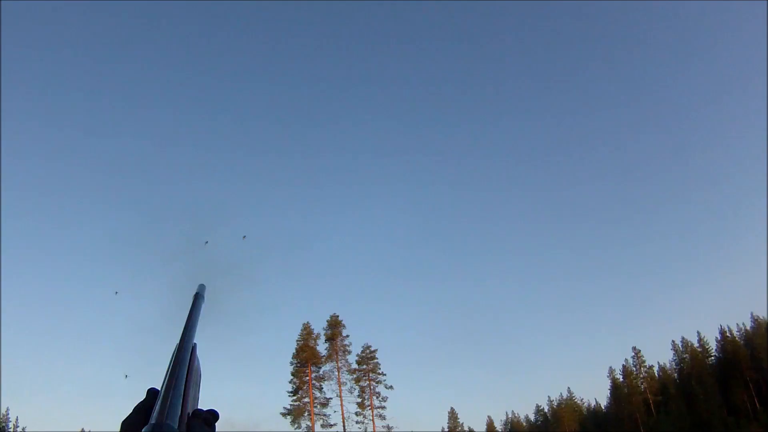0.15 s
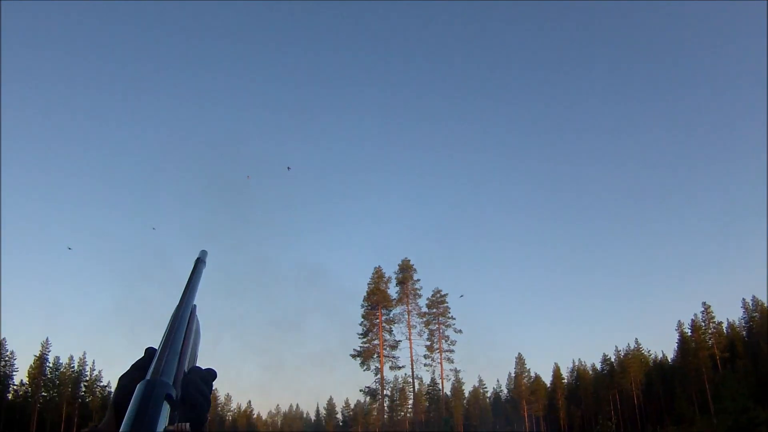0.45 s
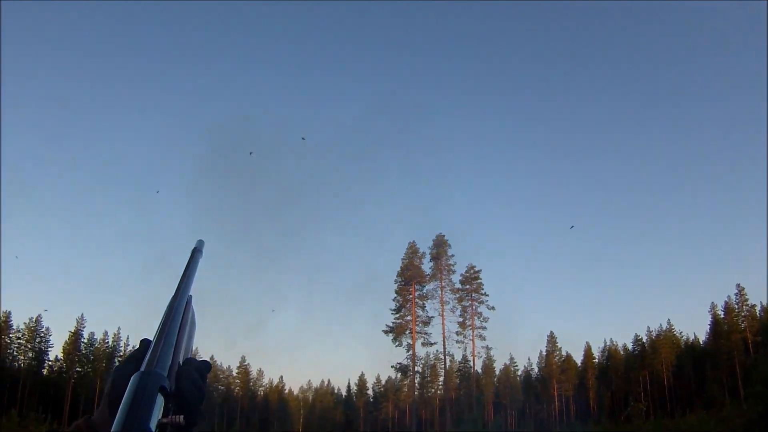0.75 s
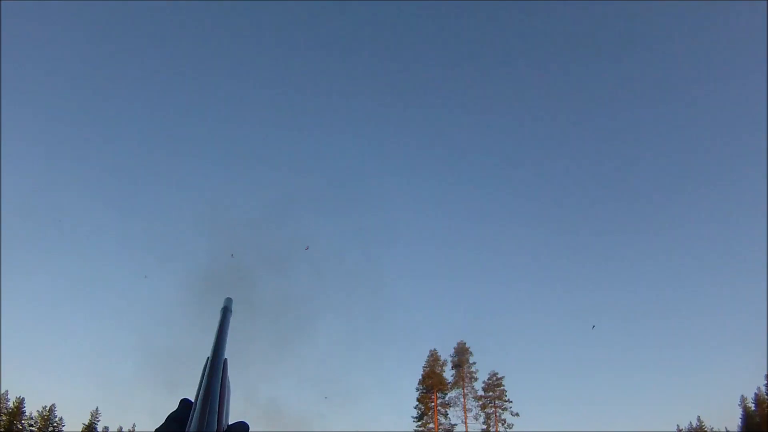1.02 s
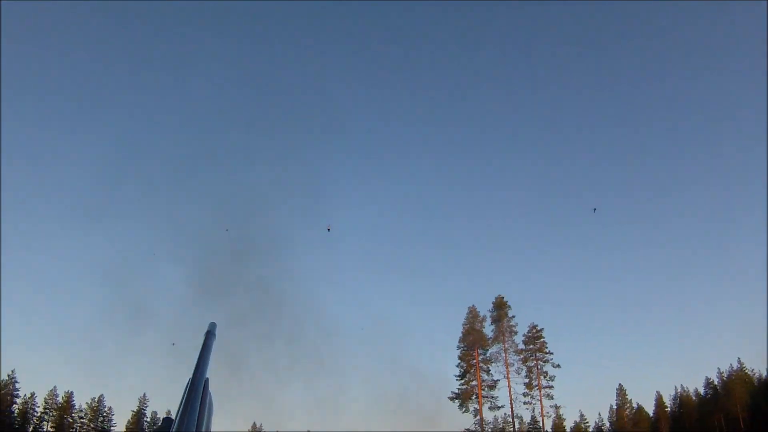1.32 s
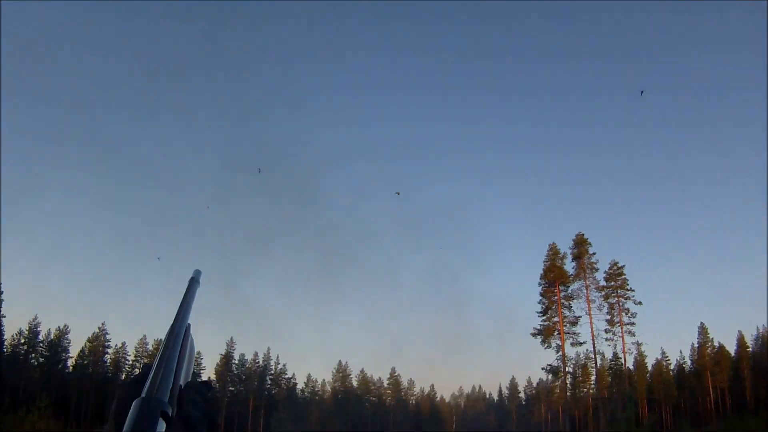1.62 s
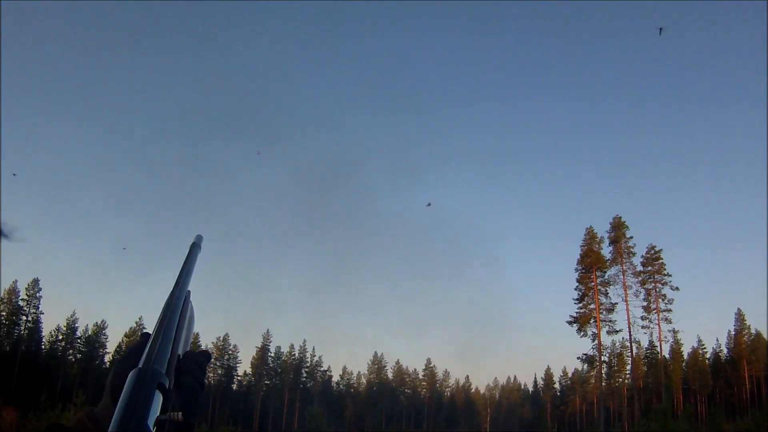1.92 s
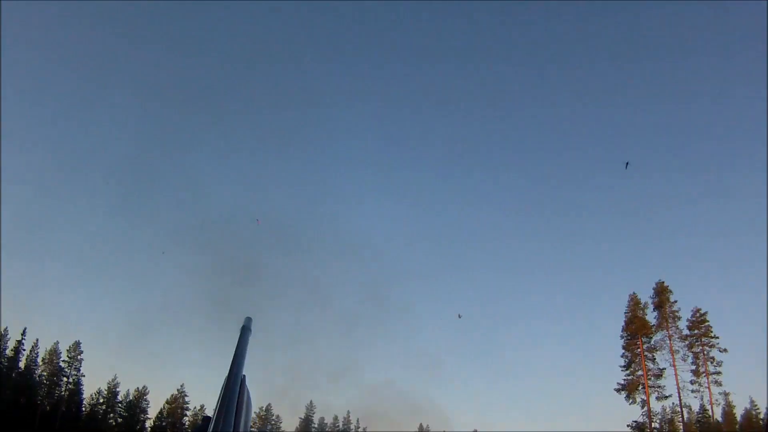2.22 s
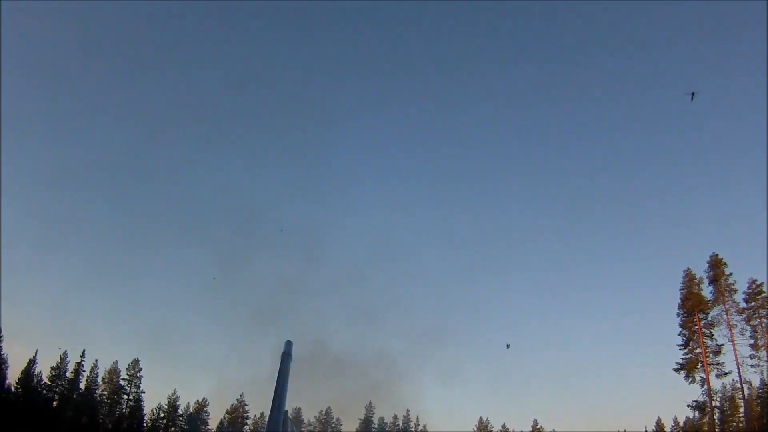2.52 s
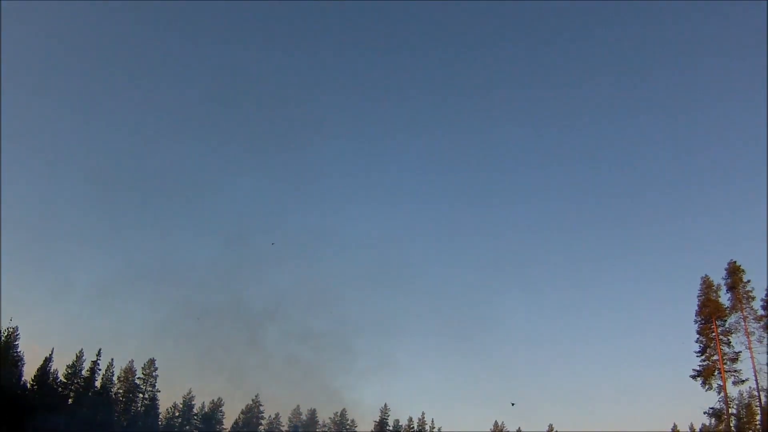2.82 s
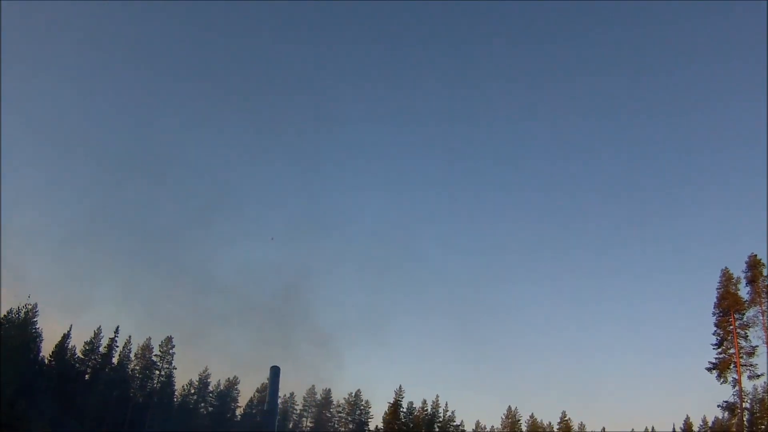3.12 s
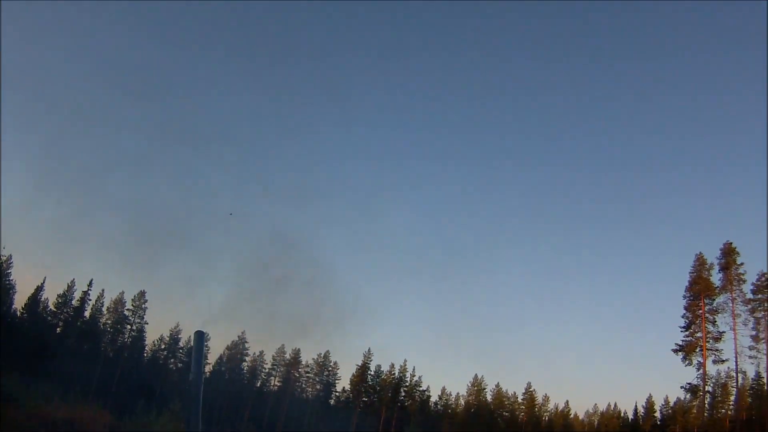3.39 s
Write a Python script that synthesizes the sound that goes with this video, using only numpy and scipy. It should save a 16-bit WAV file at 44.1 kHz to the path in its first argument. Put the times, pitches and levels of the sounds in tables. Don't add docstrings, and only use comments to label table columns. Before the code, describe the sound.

A shotgun fires beside a small camera three times, steel parts rattling after each, then another gun sounds farther away; tree lines return swelling echoes, with gritty lo-fi sound ducking at every shot.

```python
import sys
import numpy as np
from scipy import signal
from scipy.fft import rfft, irfft
from scipy.io import wavfile
from scipy.ndimage import uniform_filter1d

SR = 44100
rng = np.random.default_rng(int(sys.argv[2]) if len(sys.argv) > 2 else 0)


def inscribe(sig):
    pcm = np.round(np.clip(np.atleast_2d(sig).T, -1, 1) * 32767)
    wavfile.write(sys.argv[1], SR, pcm.astype(np.int16))


def nominal_scale(level):
    x = np.asarray(level, float) / 20
    return 10 ** x


N = 156555
T = np.arange(N) / SR
F = np.fft.rfftfreq(N, 1 / SR)

# [t/s, overload length/s, level above clipping/dB, crack level/dB]
BLASTS = [
    (.1498, .0108, 3, -3),
    (.9864, .0108, 3, 1),
    (2.1403, .0108, 2, 0),
    (2.4612, .0036, 5, -12),
]
# [gain dive/dB, afterblast level/dB, echo level/dB]
AFTERMATH = [(23.05, 0, -2), (22.2, -1, -2), (25.56, 2.5, 2.5), (9.26, -19, -13.5)]
SHOTS = [blast + after for blast, after in zip(BLASTS, AFTERMATH)]
# [t/s, level/dB, ring f/Hz, t60/s]
KNOCKS = [(.105, -47, 1000, 0.033), (0.1428, -23.5, 3060, 0.026), (0.18, 1, 5000, 0.016),
          (0.215, -12, 1190, .03), (0.24, -11, 2050, 0.033), (0.3882, -4, 1830, 0.035),
          (0.3988, 1, 1280, 0.012), (0.4016, 4, 2440, 0.011), (0.415, -9, 2020, 0.041),
          (0.436, -11, 1190, 0.035), (0.442, -11.5, 1510, 0.01), (0.453, -14.5, 2470, 0.016),
          (0.9795, -19, 3000, 0.018), (1.015, 4.5, 4080, 0.017), (1.205, 0, 3740, 0.018),
          (1.569, -26, 4740, .015), (2.1338, -17, 3000, .012), (2.171, 7, 4020, 0.016),
          (2.259, -10.5, 1450, .02)]
# [t/s, level/dB, f/Hz, t60/s]
JOLTS = [(0.386, -13.5, 85, 0.093), (.405, -14.5, 142, 0.072), (.425, -34, 220, 0.03), (.47, -22, 70, 0.12),
         (1.19, -38, 82.4, 0.24), (1.388, -29, 69, 0.12), (2.359, -19.5, 82, .15), (2.469, -4.5, 76, 0.081),
         (2.601, -27, 89.5, 0.1), (2.84, -36, 60, 0.14), (1.7, -39.5, 59.5, 0.11)]
# [distance/m, level/dB, rise/s, t60/s]
TREE_LINES = [
    (28.57, -13, 0.0033, 1.543),
    (43, -23, 0.18, 7.5),
    (81.5, -23, 0.13, 2.4),
    (148.4, -24, 0.3, 15),
]
# [f/Hz, width/Hz, level/dB]
BARREL_MODES = [(239, 57, -2), (599, 250, -5.5), (1087, 50, 3), (1974, 900, -9), (3300, 290, -25)]
# [f/Hz, level per Hz/dB]
BLAST_COLOUR = [(60, -9), (250, -2.5), (1100, -3), (2500, -5.5), (4000, -30), (5900, -6.5)]
# [f/Hz, level per Hz/dB]
SLAP_COLOUR = [(60, -15), (150, 2.5), (640, -0.5), (1200, -1), (2400, -4), (4000, -7.5), (5900, -2)]
# [f/Hz, level per Hz/dB]
GROUND_COLOUR = [(24, -39), (40, -3), (140, -8), (481, -20), (1870, -10), (2400, -16.5), (2670, -17),
                 (3650, -14), (5900, -16), (7670, -49), (13000, -120)]
# [f/Hz, level per Hz/dB]
ECHO_COLOUR = [(70, -43), (140, -25), (230, -16), (380, -2.5), (650, -1), (1150, -2), (1700, -9.5),
               (3000, -16), (5900, -27)]
# [f/Hz, level per Hz/dB]
AIR_COLOUR = [(18, -29), (30, 13), (381, -5.5), (555, -5), (902, -6), (1230, -9), (5900, -22),
              (7670, -64.5), (13000, -120)]
# [t/s, length/s, f kept below/Hz, f of a surviving band/Hz]
DROPOUTS = [(0.491, 0.006, 3300, 2960), (.757, 0.026, 2840, 10530), (1.535, 0.0035, 2310, 10800),
            (1.858, 0.004, 2520, 10800), (2.193, 0.0071, 2800, 4700), (2.324, 0.0053, 2320, 4930),
            (2.666, 0.0056, 3130, 11880), (3.008, 0.0035, 2220, 10900)]

AIR_DB = -55.5
HAMMER_LEAD_S, HAMMER_HZ, HAMMER_DB, HAMMER_T60_S = .0061, 960, -11, .022
RISE_S, RELEASE_S = .0026, .0008
CRACK_HZ, CRACK_WIDTH_HZ, CRACK_T60_S = 2800, 3300, .079
SLAP_DB, SLAP_T60_S, SLAP_ENDS_S = 1.5, .31, .03
THUMP_HZ, THUMP_DB, THUMP_T60_S = 100, 14, .028
GROUND_DB, GROUND_T60_S = -18.5, 1
RECOIL_FROM_HZ, RECOIL_TO_HZ, RECOIL_GLIDE_S = 175, 70, .16
RECOIL_DB, RECOIL_T60_S = -21, 1
TRUNKS_PER_S, TRUNK_SCATTER_DB, TRUNK_SHARE = 2500, 2, .4
AIR_LOSS_DB_S, LOSS_POWER = 8.5, .71
ROLL_DB, ROLL_PER_S = .03, 14
YOUNG_ROLL_DB, YOUNG_S = -1.5, .41
DIVE_S, RECOVER_DB_S = .0003, 72.5
CAMERA_EDGE_HZ, MIC_LOW_HZ, CLIP_DB = 5040, 41.7, -.2


def unit(x):
    return x / np.sqrt(np.mean(x ** 2))


def colour(x, table):
    hz, db = np.array(table).T
    curve_db = np.interp(np.log(F + 1), np.log(hz), db, right=-90)
    return unit(irfft(rfft(x) * nominal_scale(curve_db), N))


def fade(start, t60, rise=1e-4):
    age = np.maximum(T - start, 0)
    return (1 - np.exp(-age / rise)) * nominal_scale(-60 * age / t60)


def walk(rate):
    k = int(SR / rate)
    held = np.repeat(rng.standard_normal(N // 200), k)[:N]
    return unit(uniform_filter1d(uniform_filter1d(held, k), k))


def ring(x, hz, width):
    return signal.lfilter(*signal.iirpeak(hz, hz / width, fs=SR), x)


def evening_air():
    return nominal_scale(AIR_DB) * colour(rng.standard_normal(N), AIR_COLOUR)


def knocks():
    noise, out = rng.standard_normal(N), np.zeros(N)
    crack = colour(rng.standard_normal(N), BLAST_COLOUR)
    for s, db, hz, t60 in KNOCKS:
        steel = unit(ring(noise, hz, .45 * hz))
        out += nominal_scale(db) * fade(s, t60, .00048) * (steel + .5 * crack)
    return out


def hammer():
    out = np.zeros(N)
    for s, *_ in SHOTS[:3]:
        tone = np.sin(2 * np.pi * HAMMER_HZ * (T - s))
        out += nominal_scale(HAMMER_DB) * fade(s - HAMMER_LEAD_S, HAMMER_T60_S, .0005) * tone
    return out


def blasts():
    roar = colour(rng.standard_normal(N), BLAST_COLOUR)
    slap = colour(rng.standard_normal(N), SLAP_COLOUR)
    ground = colour(rng.standard_normal(N), GROUND_COLOUR)
    gas = rng.standard_normal(N)
    barrel = sum(nominal_scale(db) * unit(ring(gas, hz, width)) for hz, width, db in BARREL_MODES)
    roar = unit(roar + .61 * barrel)
    crack = unit(ring(gas, CRACK_HZ, CRACK_WIDTH_HZ))
    shake, drift = nominal_scale(4 * walk(45)), 1 + .3 * walk(70)
    out = np.zeros(N)
    for s, hold, over_db, crack_db, dive_db, near_db, _ in SHOTS:
        near = nominal_scale(near_db)
        age = np.maximum(T - s, 0)

        rise = np.clip((T - s) / min(RISE_S, hold / 4), 0, 1) ** 1.3
        stop = np.exp(-np.maximum(T - s - hold, 0) / RELEASE_S)
        level = nominal_scale(over_db + dive_db) / np.std(roar[(T > s) & (T < s + hold)])
        out += level * (roar + nominal_scale(crack_db) * crack * fade(s, CRACK_T60_S)) * rise * stop

        slap_end = np.exp(-np.maximum(T - s - SLAP_ENDS_S, 0) / .012)
        out += near * nominal_scale(SLAP_DB) * slap * fade(s, SLAP_T60_S) * slap_end
        thump = np.sin(2 * np.pi * THUMP_HZ * (T - s - hold))
        out -= near * nominal_scale(THUMP_DB) * thump * fade(s + hold, THUMP_T60_S)
        out += near * nominal_scale(GROUND_DB) * ground * fade(s, GROUND_T60_S)

        hz = RECOIL_TO_HZ + (RECOIL_FROM_HZ - RECOIL_TO_HZ) * np.exp(-age / RECOIL_GLIDE_S)
        rumble = shake * np.sin(2 * np.pi * np.cumsum(hz * drift) / SR)
        out += near * nominal_scale(RECOIL_DB) * rumble * fade(s, RECOIL_T60_S, .018)
    return out


def forest():
    hit, size, side = rng.random((N, 3)).T
    trunks = (hit < TRUNKS_PER_S / SR) * np.sign(side - .5) * nominal_scale(-TRUNK_SCATTER_DB * np.log(size + .012))
    wash = rng.standard_normal(N)
    mix = np.sqrt(TRUNK_SHARE) * unit(trunks) + np.sqrt(1 - TRUNK_SHARE) * wash
    field = rfft(colour(mix, ECHO_COLOUR))
    swells = []
    for s, *_, echo_db in SHOTS:
        swell = sum(nominal_scale(db) * fade(s + 2 * m / 343, t60, rise) for m, db, rise, t60 in TREE_LINES)
        swells.append(nominal_scale(echo_db) * swell)
    young = sum(fade(s, np.log(1000) * YOUNG_S) for s, *_ in SHOTS[:3])
    roll = ROLL_DB * walk(ROLL_PER_S) + YOUNG_ROLL_DB * young * walk(110)
    out = np.zeros(N)
    for octave in np.arange(7, 13.1, .75):
        band = irfft(field * np.clip(1 - abs(np.log2(F + 1) - octave) / .75, 0, 1), N)
        loss_db = AIR_LOSS_DB_S * (2 ** octave / 1000) ** LOSS_POWER
        power = np.zeros(N)
        for swell, (s, *_) in zip(swells, SHOTS):
            power += (swell * nominal_scale(-loss_db * np.maximum(T - s - .4, -.3))) ** 2
        out += band * np.sqrt(power) * nominal_scale(roll + 1.3 * walk(14))
    return out


def jolts():
    out = np.zeros(N)
    for s, db, hz, t60 in JOLTS:
        out += nominal_scale(db) * np.sin(2 * np.pi * hz * (T - s)) * fade(s, t60, .0027)
    return out


def scene():
    return (evening_air() + knocks() + hammer() + blasts() + forest() + jolts())[None]


def gain_dive():
    dive = np.zeros(N)
    for s, hold, _, _, dive_db, *_ in SHOTS:
        start = dive[int(s * SR)]
        drop = dive_db * np.clip((T - s) / DIVE_S, 0, 1)
        after = start + drop - RECOVER_DB_S * np.maximum(T - s - hold, 0)
        dive = np.where(T > s, np.maximum(after, 0), dive)
    return dive


def sample_and_hold(x):
    x = np.clip(signal.resample_poly(x, 40, 147), -nominal_scale(CLIP_DB), nominal_scale(CLIP_DB))
    x = signal.resample_poly(np.repeat(x, 4), 147, 160)[:N]
    return np.pad(x, (0, N - len(x)))


def treble_dropouts(x):
    for s, length, hz, left_hz in DROPOUTS:
        first = int((s - .1) * SR)
        around = x[first:int((s + .1) * SR)]
        part = slice(first, first + len(around))
        dull = signal.sosfiltfilt(signal.butter(8, [170, hz], "band", fs=SR, output="sos"), around)
        for f in [left_hz] + [13000] * (left_hz > 9000):
            survivor = signal.butter(3, [f - 250, f + 250], "band", fs=SR, output="sos")
            dull = dull + signal.sosfiltfilt(survivor, around)
        keep = np.clip((abs(T[part] - s) - length / 2) / .007, .003, 1)
        x[part] = dull + keep * (around - dull)
    return x


def low_pass(x):
    return signal.sosfilt(signal.butter(12, 16090, fs=SR, output="sos"), x)


def record(dry):
    x = dry[0] * nominal_scale(-gain_dive())
    x = signal.sosfilt(signal.butter(4, CAMERA_EDGE_HZ, fs=SR, output="sos"), x)
    x = signal.sosfilt(signal.butter(2, MIC_LOW_HZ, "high", fs=SR, output="sos"), x)
    mix = treble_dropouts(sample_and_hold(x))
    return low_pass(mix)


dry = scene()
out = record(dry)
inscribe(out)
```